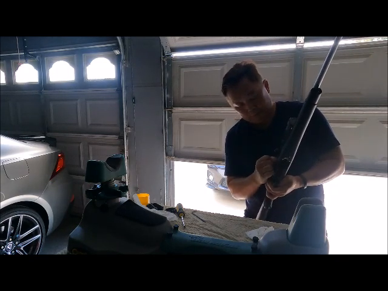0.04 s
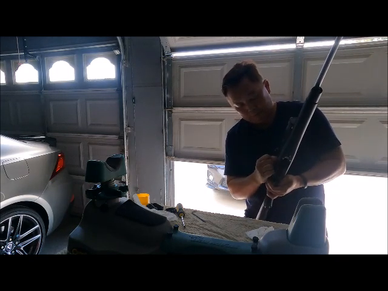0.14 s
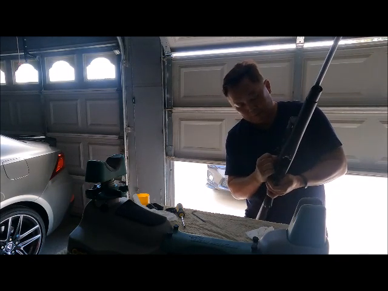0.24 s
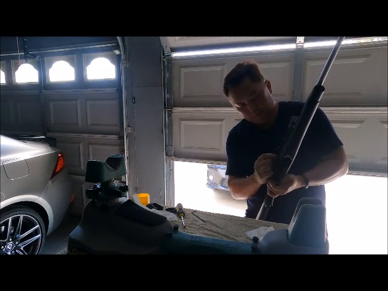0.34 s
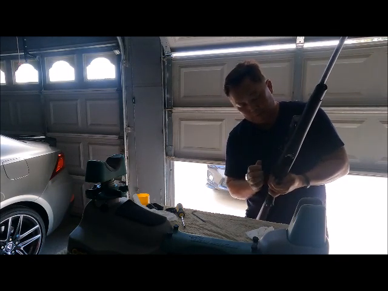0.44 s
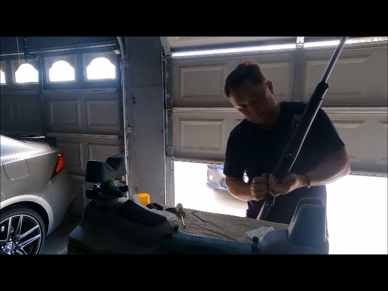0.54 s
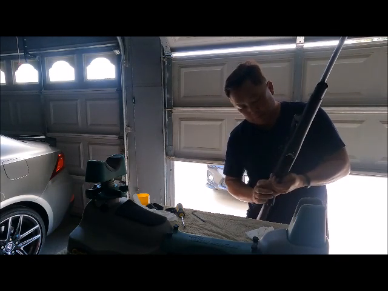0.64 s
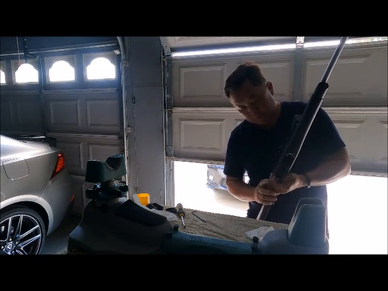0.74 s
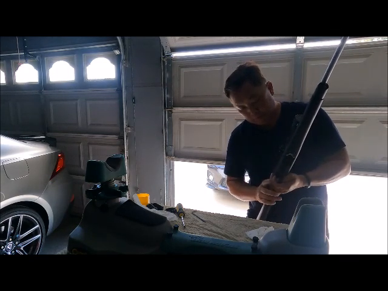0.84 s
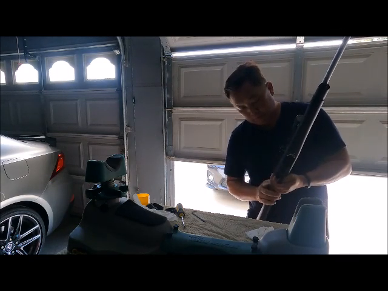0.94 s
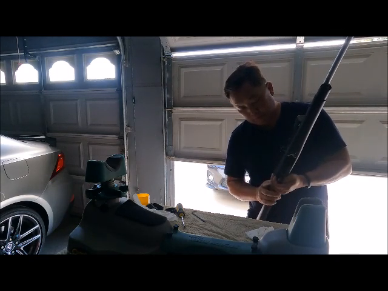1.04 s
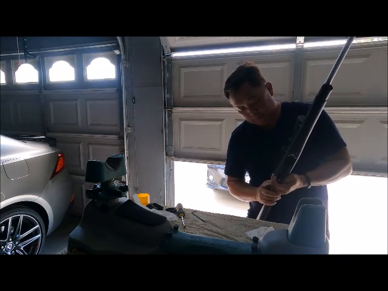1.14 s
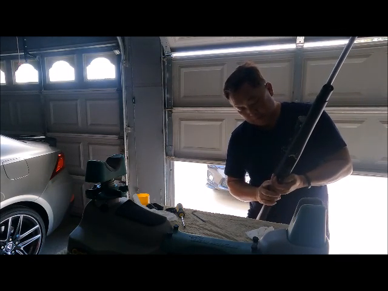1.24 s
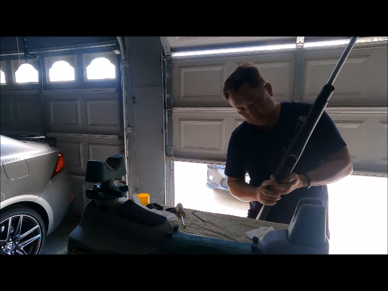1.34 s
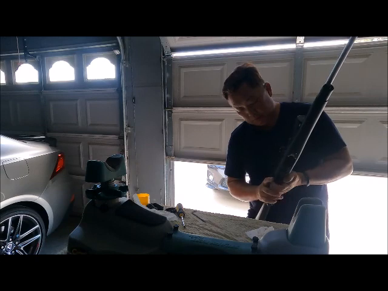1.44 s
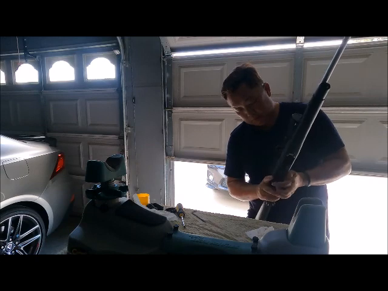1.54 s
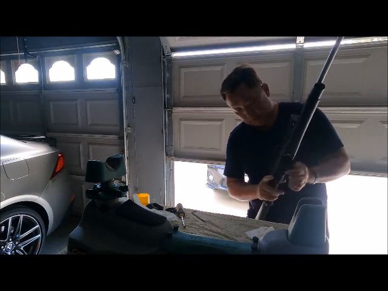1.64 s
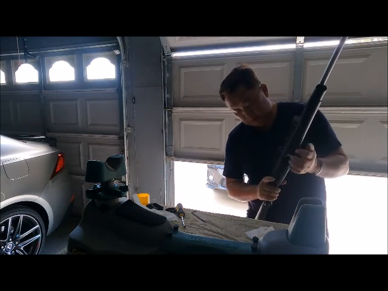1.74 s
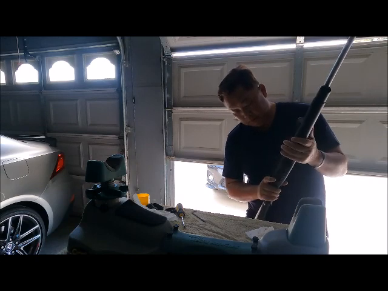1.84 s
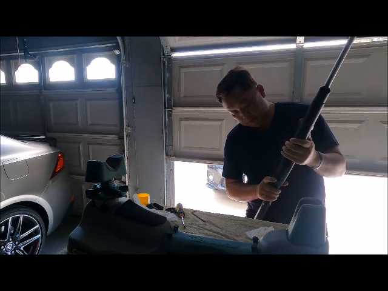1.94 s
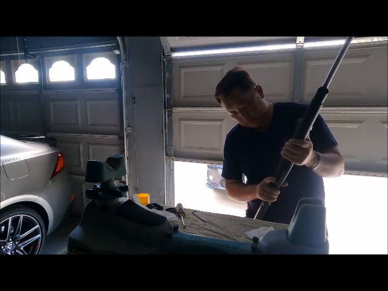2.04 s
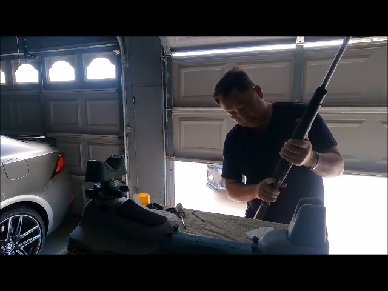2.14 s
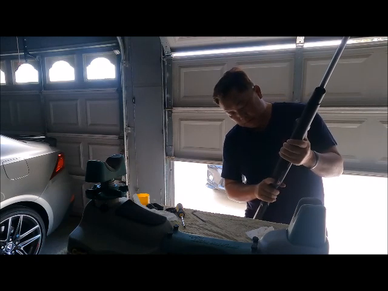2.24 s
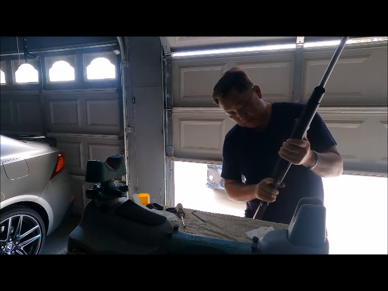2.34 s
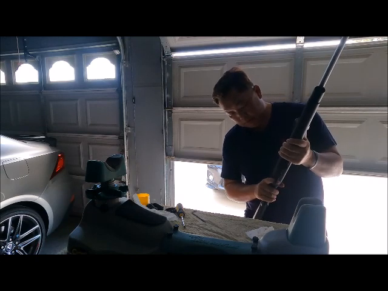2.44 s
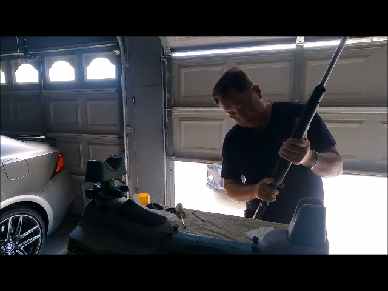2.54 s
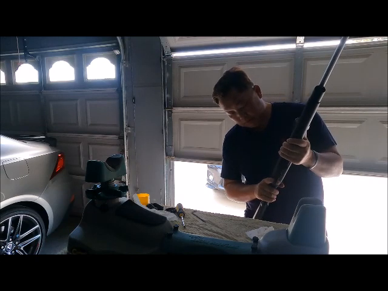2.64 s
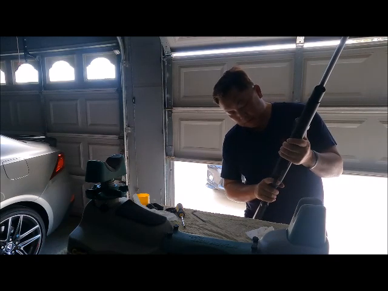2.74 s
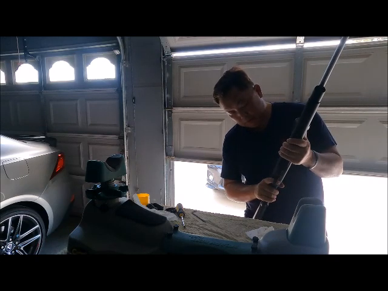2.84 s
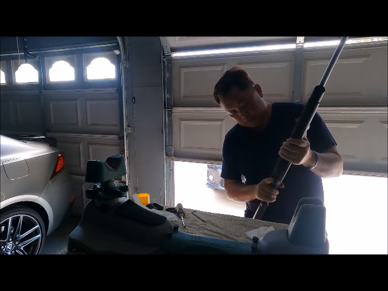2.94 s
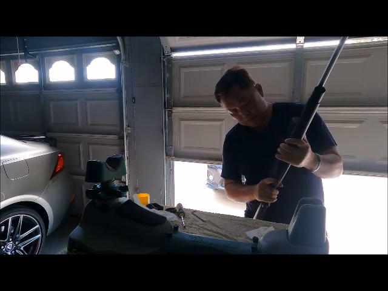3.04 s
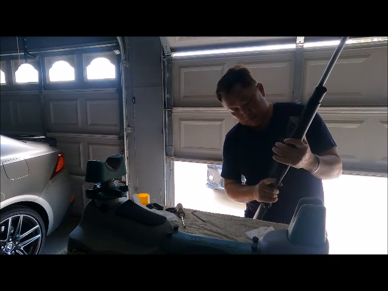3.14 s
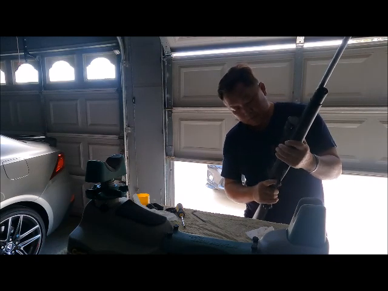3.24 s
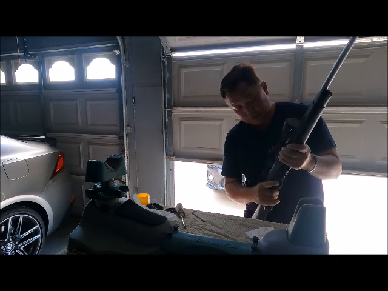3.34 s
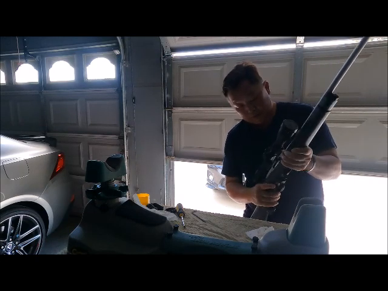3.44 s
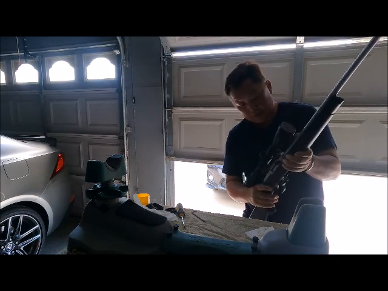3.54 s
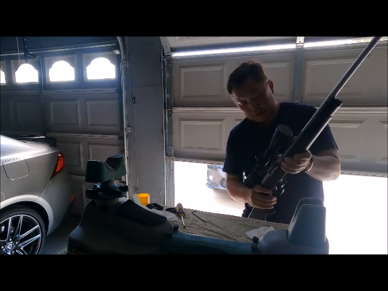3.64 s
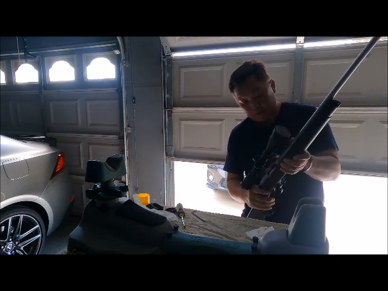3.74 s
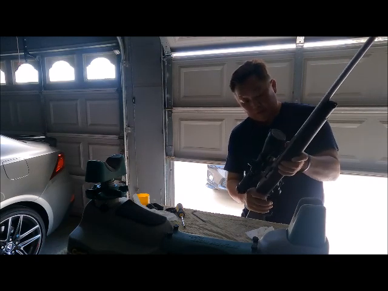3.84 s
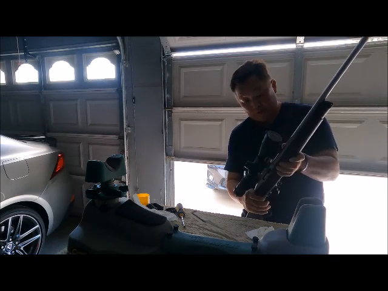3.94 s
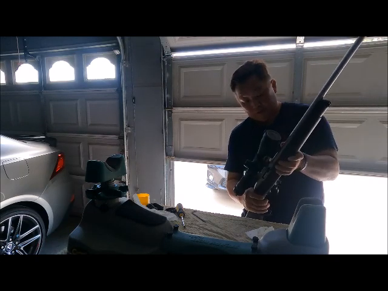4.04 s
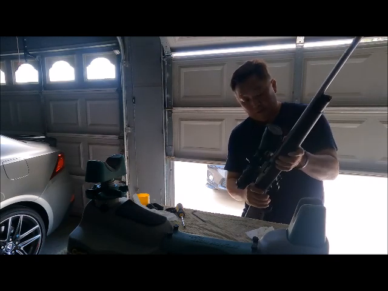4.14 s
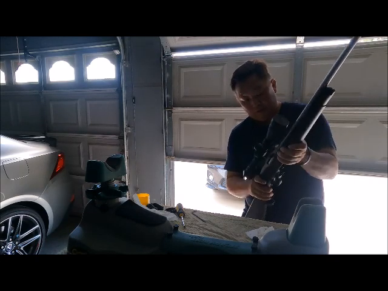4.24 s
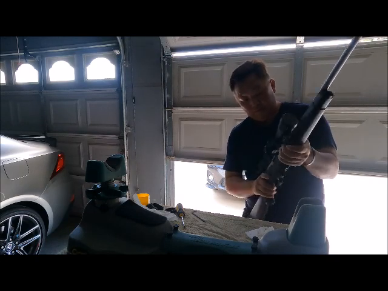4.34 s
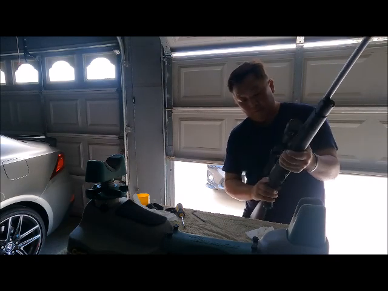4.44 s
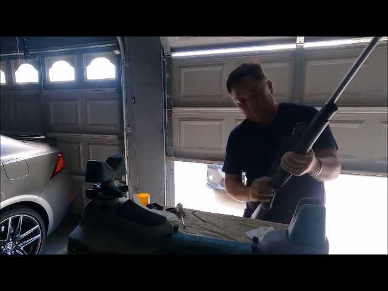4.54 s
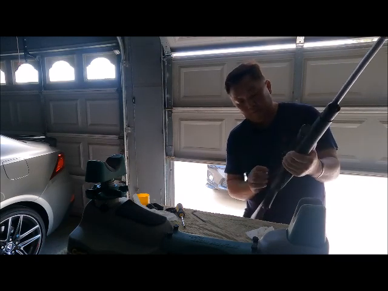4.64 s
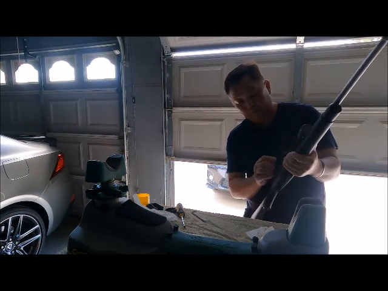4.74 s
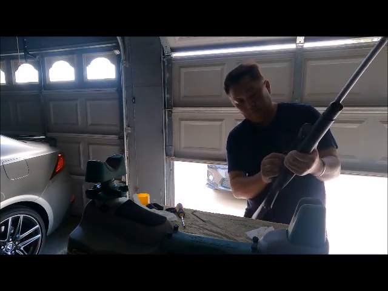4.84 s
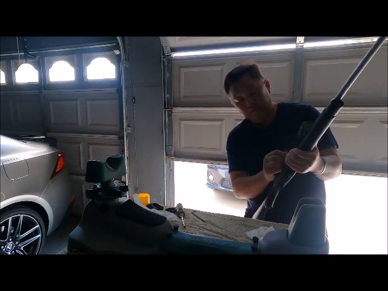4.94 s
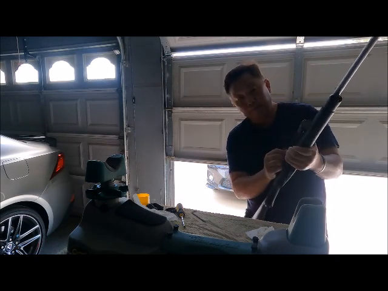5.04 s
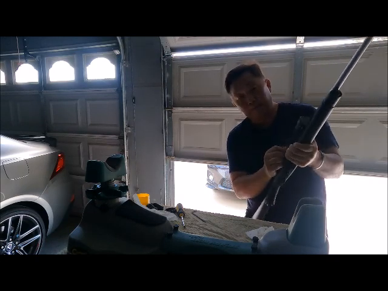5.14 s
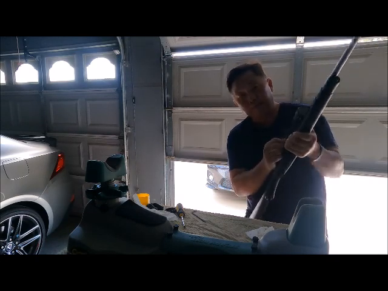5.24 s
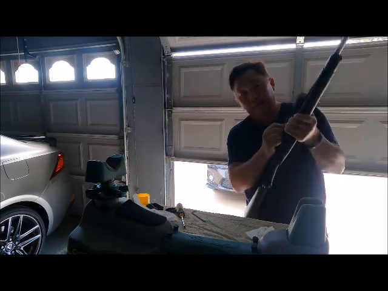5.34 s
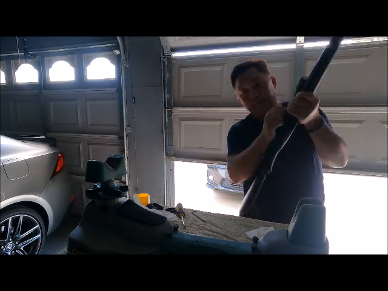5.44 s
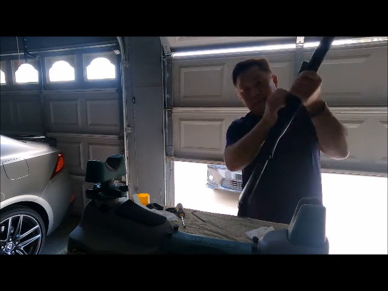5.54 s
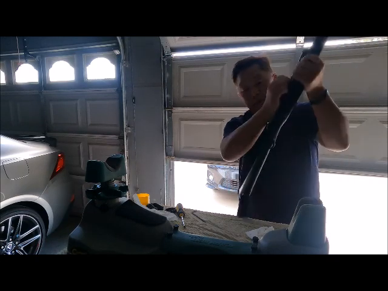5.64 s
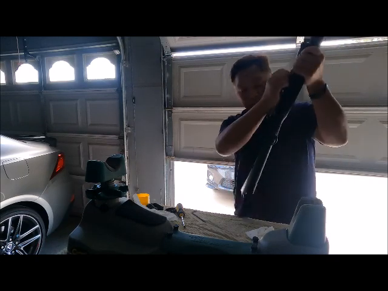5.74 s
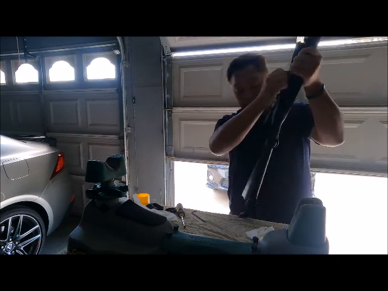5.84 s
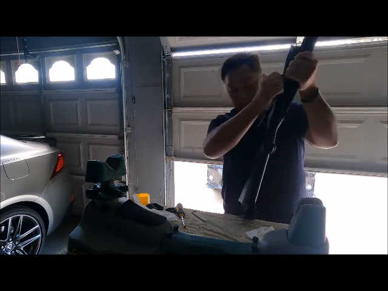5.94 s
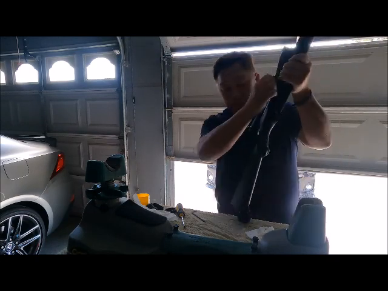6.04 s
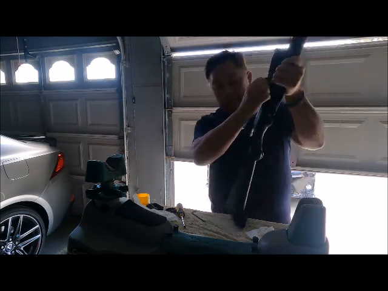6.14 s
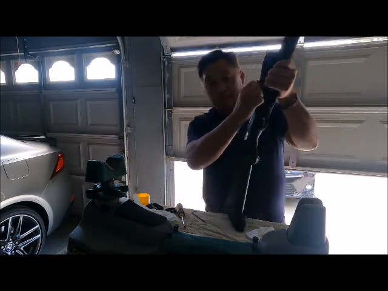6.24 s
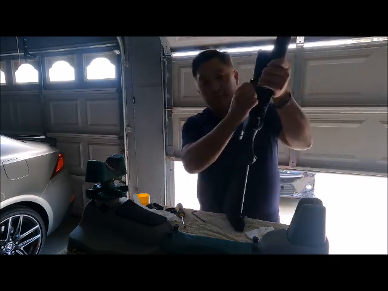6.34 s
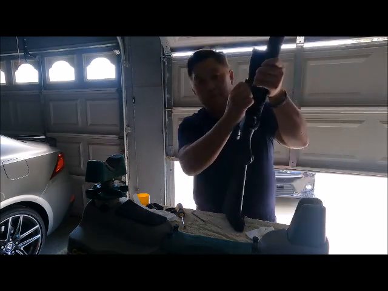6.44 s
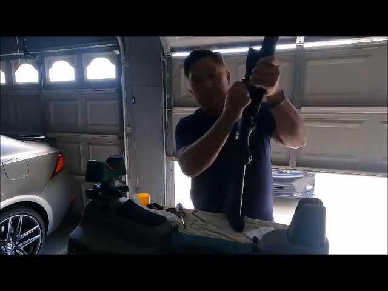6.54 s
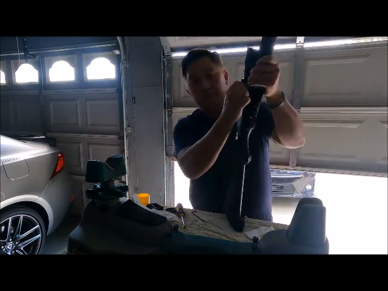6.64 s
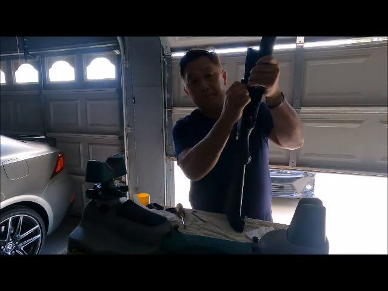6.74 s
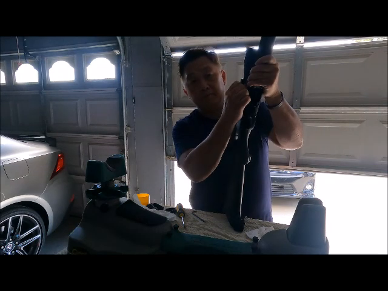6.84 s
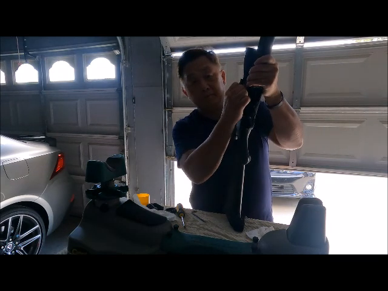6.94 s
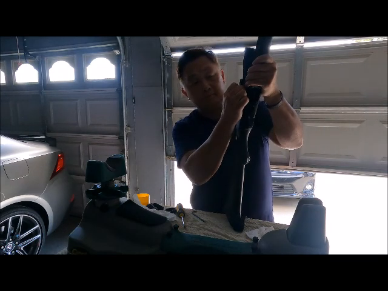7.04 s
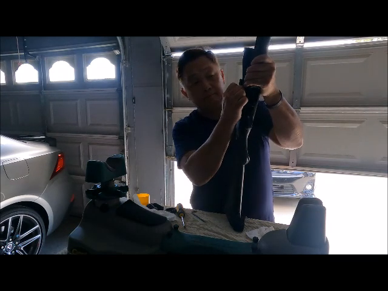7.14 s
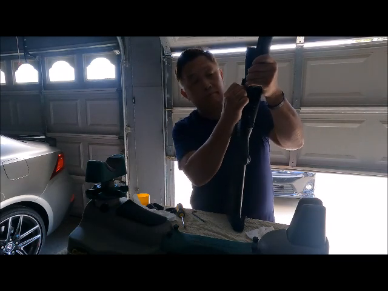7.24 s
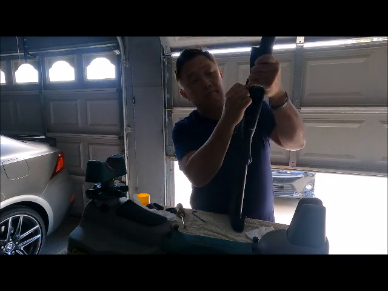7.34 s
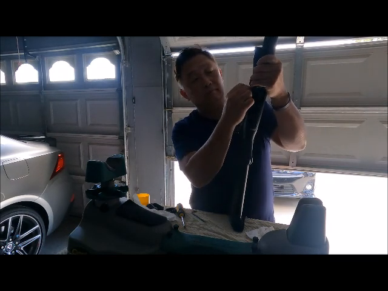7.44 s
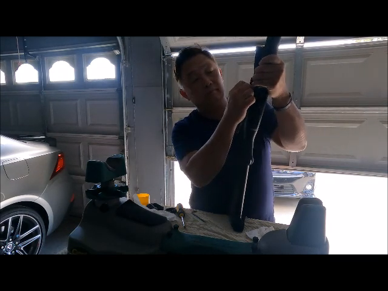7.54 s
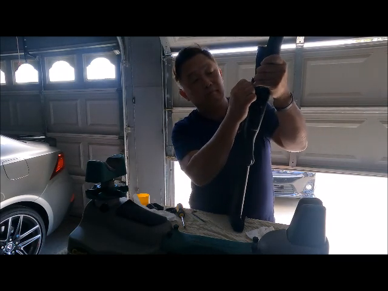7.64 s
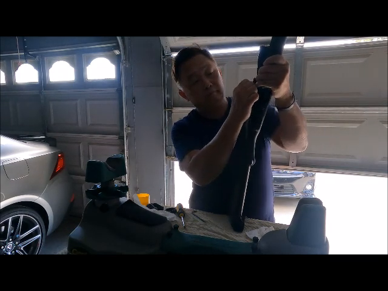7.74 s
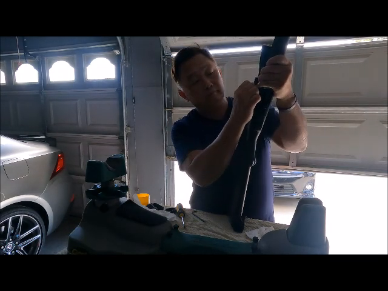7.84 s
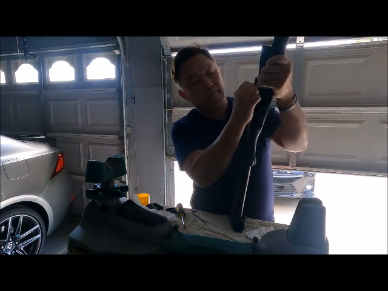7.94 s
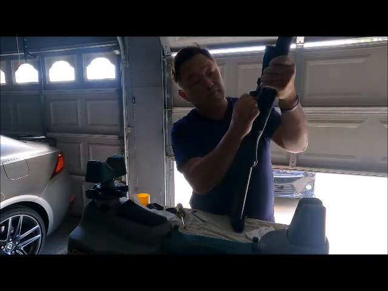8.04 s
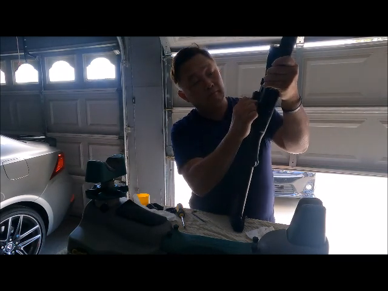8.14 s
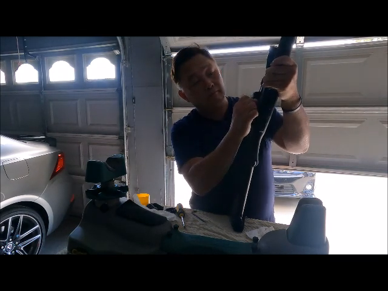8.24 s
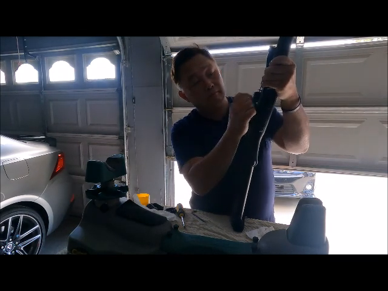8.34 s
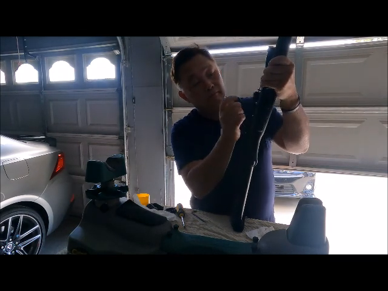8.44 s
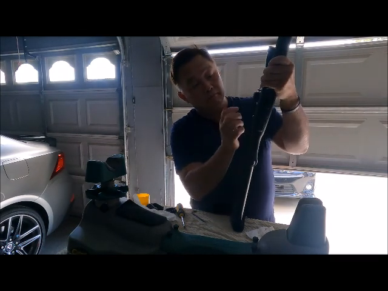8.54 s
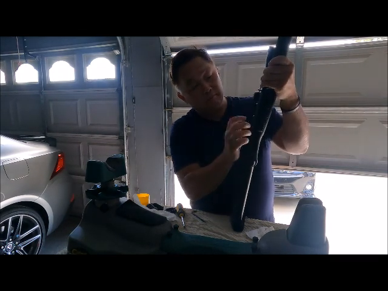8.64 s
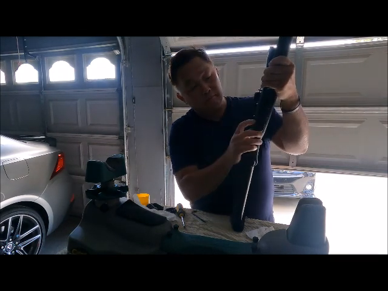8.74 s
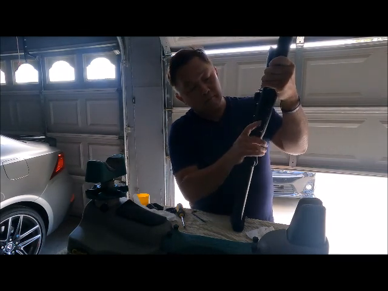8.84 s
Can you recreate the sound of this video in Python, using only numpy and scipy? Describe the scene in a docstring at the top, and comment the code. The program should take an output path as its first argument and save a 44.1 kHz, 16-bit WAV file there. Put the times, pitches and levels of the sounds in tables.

```python
"""A rifle's bolt and trigger are worked by hand over a bench in a concrete garage with the door half open.
Steel snaps on steel as impacts exciting damped modes; the butt set down on the bench drives its modes too.
Hands and the sliding bolt rub as grains of friction noise; outdoor rumble, hiss and hums drift in.
Shaped noise gives the garage echo, and a small recorder limits its treble hard after loud clicks."""
import sys
import numpy as np
from scipy import signal
from scipy.fft import rfft, irfft
from scipy.io import wavfile
from scipy.ndimage import uniform_filter1d

SR = 44100
rng = np.random.default_rng(int(sys.argv[2]) if len(sys.argv) > 2 else 0)


def unload_wav(signal):
    """Save mono or channel-first audio to the path in sys.argv[1] as 16-bit WAV at rate SR, clipped to [-1, 1]."""
    wavfile.write(
        sys.argv[1],
        SR,
        np.round(np.clip(np.atleast_2d(signal).T, -1, 1) * 32767).astype(np.int16),
    )


N = 391608   # samples


def from_db(db):
    """Logarithmic level: decibels to amplitude gain."""
    return 10 ** (np.asarray(db) / 20)


def rms_one(x):
    """Normalisation: scale to unit rms."""
    return x / np.sqrt(np.mean(x ** 2) + 1e-20)


def at_hz(points, hz):
    """Logarithmic frequency: interpolate a table of (f/Hz, value) along a log-frequency axis."""
    f_hz, value = np.transpose(points)
    return np.interp(np.log(hz), np.log(f_hz), value)


def butter(x, order, hz, kind="low"):
    """Maximally flat filtering: Butterworth low-pass, high-pass or band-pass."""
    return signal.sosfilt(signal.butter(order, hz, kind, fs=SR, output="sos"), x)


def drift(rate_hz):
    """Random modulation: white noise through a double real pole, scaled to unit rms."""
    step = 40   # samples between computed points
    pole = np.exp(-2 * np.pi * rate_hz * step / SR)
    white = rng.standard_normal(N // step + 2002)
    slow = signal.lfilter([1], [1, -2 * pole, pole ** 2], white)[2000:]   # start-up dropped
    return np.interp(np.arange(N) / step, np.arange(len(slow)), rms_one(slow))


def ring(x, hz, t60):
    """Damped resonance: a unit impulse sets off a decaying sine of initial height 1."""
    radius = from_db(-60 / (t60 * SR))
    omega = 2 * np.pi * hz / SR
    feedback = [1, -2 * radius * np.cos(omega), radius ** 2]
    return signal.lfilter([0, np.sin(omega)], feedback, x + 1e-18)


# likeness of left and right in diffuse sound: (f/Hz, correlation)
STEREO_LIKENESS = [(60, 1), (550, 0.85), (1650, 0.53), (4970, 0.68), (15000, 0.274)]


def noise_bands(size):
    """Interchannel coherence: yields (f/Hz, stereo half-octave noise), mid and side mixed to the set likeness."""
    edges = 22 * 2 ** np.arange(0, 9.9, .5)
    white = rng.standard_normal((2, 2, size))   # neighbouring bands take different noise
    for k, (low, high) in enumerate(zip(edges, edges[1:])):
        centre = np.sqrt(low * high)
        mid, side = butter(white[k % 2], 2, [low, high], "band")
        alike = at_hz(STEREO_LIKENESS, centre)
        yield centre, np.sqrt(1 + alike) * mid + np.sqrt(1 - alike) * side * [[1], [-1]]


# spectral density of the outdoor noise: (f/Hz, relative level/dB per Hz)
OUTDOOR_SPECTRUM = [(25, -27), (49, 1.5), (93, -9.5), (176, 3), (383, -4), (475, -12.5), (709, -2),
                    (833, -14.5), (1540, -13), (3090, -50), (5720, -22), (9270, -41.5), (15000, -71)]
# course of the outdoor level: (t/s, level/dB)
OUTDOOR_SWELL = [(0, -46), (0.599, -56), (1.201, -55.5), (1.8, -51), (2.503, -51.5), (4.302, -49.5),
                 (4.9, -49), (5.795, -49.5), (6.8, -51), (8.88, -52.5)]
# narrow humming bands: (f/Hz, nominal width/Hz, level/dB against the outdoor noise)
HUM_BANDS = [(190, 22, -6), (285, 16, -10.5), (381.7, 4, -10.5), (472.7, 4.6, -12), (587, 6, -13.5),
             (5630, 210, -21.5)]


def outdoors():
    """Modulated band noise: rumble and hiss swell in patches, lows most, with a few wavering hums."""
    together = drift(0.95)
    wash = 0
    for hz, band in noise_bands(size=N):
        swell_db = 1.7 * together + 2.0 * drift(4.0)
        depth = min(1, 640.0 / hz) ** .5   # treble swells less
        wash = wash + from_db(at_hz(OUTDOOR_SPECTRUM, hz) + swell_db * depth) * band
    white = rng.standard_normal(N)
    # noise through a narrow resonance wavers
    hums = sum(from_db(db) * rms_one(ring(white, hz, 9.2 / width)) for hz, width, db in HUM_BANDS)
    level_db = np.interp(np.arange(N) / SR, *np.transpose(OUTDOOR_SWELL))
    return from_db(level_db) * (rms_one(wash) + hums)


# reverberation time of the garage: (f/Hz, t60/s)
GARAGE_DECAY = [(100, 0.62), (500, 0.73), (1500, 0.51), (4000, 0.63), (8000, 0.48), (14000, 0.3)]
# initial colour of the echo: (f/Hz, relative level/dB)
GARAGE_TONE = [(100, -1), (700, -2.5), (2000, 3.5), (5000, 5.5), (8000, 0), (14000, -1)]


def garage(x):
    """Diffuse reverberation: convolve with noise, lumpy with early reflections, dying band by band."""
    time = np.arange(SR) / SR
    tail = 0
    for hz, band in noise_bands(size=SR):
        decay_db = 60 * time / at_hz(GARAGE_DECAY, hz)
        tail = tail + from_db(at_hz(GARAGE_TONE, hz) - decay_db) * band
    onset = np.clip((time - .003) / 0.0016, 0, 1)   # silent 3 ms, then builds up over 1.6 ms
    lumps_db = 5.04 * np.exp(-time / .06) * drift(120)[:SR]
    tail = tail * onset * from_db(lumps_db)
    tail = tail / np.sqrt(np.sum(tail ** 2) / 2)   # unit energy per channel on average
    return signal.oaconvolve(x[None], tail, axes=1)[:, :N]


# spectral density of friction: (f/Hz, relative level/dB per Hz)
RUB_SPECTRUM = [(480, -18.5), (1020, -15.5), (1660, -12), (4130, -14.5), (7470, -14.5), (15000, -34.5)]
# bolt slides into its stop: (t/s of the stop, relative level/dB at the stop)
BOLT_SLIDES = [(0.4769, -24), (2.017, -41), (5.949, -47), (8.145, -31.5), (8.457, -32.5)]
SLIDE_RISE_DB_PER_S = 1001
# hands and cloth on the stock: (t/s of the peak, relative level/dB, swell/s, fade/s, bright share 0-1);
# swell and fade each span 20 dB
HAND_RUSTLES = [(0.068, -35, 0.016, 0.052, 0.6), (1.55, -73, 0.24, 0.4, 0.73),
                (1.963, -62, 0.021, 0.019, 0), (3.46, -72.5, 0.11, 1, 0.43), (3.7, -71.5, 0.19, 0.43, 1),
                (4.3, -63.5, 0.061, 0.15, 0.6), (4.52, -67.5, 0.097, 1, 0.42),
                (4.98, -73, 0.056, 0.57, 0.73), (5.531, -66.5, 0.23, 0.33, 0.78),
                (5.68, -57.5, 0.059, 0.1, 0.53), (5.822, -46.5, 0.02, 0.1, 0.33),
                (5.856, -53.5, 0.028, 0.16, 0.18), (6.57, -58, 0.23, 0.14, 0.36),
                (6.767, -46, 0.059, 0.079, 0.28), (7.322, -50, 0.0092, 0.25, 0),
                (7.9, -71.5, .055, 0.48, 0.5)]
BRIGHT_FROM_HZ = 3700


def rubbing():
    """Stick-slip friction: dense uneven grains under each slide and rustle; cloth hisses brighter than palms."""
    time = np.arange(N) / SR
    grains = rng.standard_normal(N) * from_db(2.8 * drift(200) + 1.2 * drift(24))
    hz = np.maximum(np.arange(N // 2 + 1) * SR / N, 1)
    grains = rms_one(irfft(rfft(grains) * from_db(at_hz(RUB_SPECTRUM, hz)), N))
    dull = 2 * butter(grains, 1, BRIGHT_FROM_HZ)
    bright = 2 * grains - dull
    out = np.zeros(N)
    for stop_s, db in BOLT_SLIDES:
        rise_db = db - SLIDE_RISE_DB_PER_S * np.abs(stop_s - time)
        out += grains * from_db(rise_db) * (time < stop_s)   # silent from the stop on
    for peak_s, db, swell_s, fade_s, share in HAND_RUSTLES:
        away = np.maximum((peak_s - time) / swell_s, (time - peak_s) / fade_s)
        level = from_db(np.maximum(db - 20 * away, -200))
        out += level * (share * bright + (1 - share) * dull)
    return out


WAYS = 3   # separate paths into the room


def strike(times, levels_db, modes, contact_s, scatter_db):
    """Modal superposition: each blow feeds every mode (a column of levels_db) with its own strength.
    Row 0 is heard directly, as an uneven dying chatter; the other rows leave on different ways into the room."""
    steps = np.arange(round(5 * np.max(contact_s) * SR) + 200)
    at = np.round(np.array(times) * SR).astype(int)[:, None] + steps
    fade = (steps + 1) ** 0.93 * np.exp(-steps / (np.reshape(contact_s, (-1, 1)) * SR))
    strengths = from_db(levels_db + rng.normal(0, scatter_db, levels_db.shape))
    out = np.zeros((1 + WAYS, N))
    for k, (hz, mode_db, t60) in enumerate(modes):
        chatter = rng.standard_normal(at.shape) * fade
        # the chatter gives the mode as much energy as one clean tap of that strength
        tap_energy = np.sum(ring(steps == 0, hz, t60) ** 2)
        chatter_energy = np.sum(ring(chatter, hz, t60) ** 2, axis=1)
        gain = strengths[:, k] * np.sqrt(tap_energy / chatter_energy)
        force = np.zeros((2, N))   # direct chatter, single tap into the room
        np.add.at(force[0], at, chatter * gain[:, None])
        # long thin rings are heard mostly directly
        force[1, at[:, 0]] = strengths[:, k] * min(1, 0.076 / t60)
        # neighbouring modes beam in different directions
        out[[0, 1 + k % WAYS]] += from_db(mode_db) * ring(force, hz, t60)
    return out


# blows through the butt: (t/s, thud relative level/dB, boom relative level/dB, knock relative level/dB,
# decay constant of the rattle/s)
BUTT_BLOWS = [(5.835, -50, -39.5, -50, 0.0047), (5.9525, -55, -23, -10.5, 0.011),
              (5.977, -56, -16.5, -13.5, 0.024), (7.3166, -52, -41, -30.5, 0.012),
              (7.426, -52, -28.5, -28, 0.0075), (8.1698, -42, -19, -24, 0.0027),
              (8.481, -11, -24, -33, 0.0016)]
# modes of the bench top and what lies on it: (f/Hz, relative level/dB, t60/s)
BENCH_MODES = [(472, -11.5, 0.51), (528.5, -11, 0.6), (598.3, -17, 0.26), (700, -9, 0.014),
               (913, -11, 0.049), (1084, -8.5, 0.036), (1237, -8.5, 0.044), (1305, -12, 0.22),
               (1528, -16, 0.13), (1645, -17, 0.11), (2020, -7.5, 0.0094), (2500, -10, 0.011),
               (3560, -3.5, 0.0026), (4640, -7.5, 0.0047), (7200, 6.5, 0.00093)]
# bench frame (first row) and top flexing: (f/Hz, relative level/dB, t60/s)
BOOM_MODES = [(52.6, 10, 0.021), (117.7, -14, 0.26), (149, -2, 0.14), (159.5, 2, 0.19), (215, -1.5, 0.14),
              (253.6, -4.5, 0.092)]


def bench():
    """Forced plate vibration: the butt pad drives the frame, the top's boom, and the knock of what lies on it."""
    s, thud_db, boom_db, knock_db, rattle_s = np.transpose(BUTT_BLOWS)
    pushes = np.zeros((2, N))   # on the frame, on the top
    pushes[:, (s * SR).astype(int)] = -from_db([thud_db, boom_db])   # always downward
    pushes[1] = butter(pushes[1], 2, 85, "high")   # the top alone radiates no deep bass
    boom = np.zeros(N)
    for k, (hz, db, t60) in enumerate(BOOM_MODES):
        boom += from_db(db) * ring(pushes[min(k, 1)], hz, t60)
    boom = butter(boom, 2, 450)   # the pad is soft
    knock_levels = np.outer(knock_db, np.ones(len(BENCH_MODES)))
    return boom, strike(s, knock_levels, BENCH_MODES, rattle_s, scatter_db=2.5)


# steel contacts: (t/s, relative level/dB of the low, middle, high and locked modes, contact decay constant/ms)
STEEL_CLICKS = [(0.0797, -11.5, -17, -30, -30, 1.2), (0.0836, -29, -18, -10, -21, 0.5),
                (0.0868, -6.5, -6, -5, -6, 0.65), (0.1047, 5.5, 7.5, -3, -11, 1.214),
                (0.4746, -17, -1, -18, -4.5, 0.34), (0.476, -28, -18, -17, -11, 0.38),
                (0.483, -31, -19, -21, -25, 0.31), (0.4873, 0, -12, 13, 16.5, 0.93),
                (1.1738, -28.5, -80.5, -7.5, -9.5, 0.58), (2.0125, -40, -22, -30, -37.5, 2.5),
                (2.6646, -16, -16.5, -13.5, -16.5, 1.36), (2.6715, -6.5, 4.5, 5, 10, 1.4),
                (2.6762, 2, -2, 5, 5, 1.6), (2.682, -7.5, -12.5, -1, -19, 2.43),
                (3.162, -49, -31, -31, -41.5, 0.74), (3.1685, -24, -24, -39, -32, 1.0),
                (3.178, -37, -20.5, -21, -26.5, 1.2), (3.3616, -34.5, -23, -34, -41, 2.1),
                (3.6886, -47, -59, -41, -31, 12), (5.5204, -39, -46, -40, -21.5, 4.7),
                (5.9496, 4, -14, 3, -20, 6.7), (6.0768, -17, -32, -2.5, -17, 11.4),
                (6.7126, -44, -16.5, -19.5, -31, 0.97), (7.1042, -43, -25, -24, -42, 0.42),
                (7.3171, -15.5, -30, -22, -23, 6.6), (7.4248, -2.5, -6.5, -5.5, -6, 1.25),
                (7.8918, -45, -38, -48.5, -42, 1.2), (8.1432, -14, -8, 1, 2.5, 0.65),
                (8.149, 0, -21, -20, -21, 7.8), (8.1676, 2.5, 9, -2, -4, 0.94),
                (8.459, -8, -4.5, -16, -20, 1.59), (8.4777, 4.5, 2, 11.5, 14.5, 1.2)]
# tiny bright ticks of steel: (t/s, relative level/dB)
STEEL_TICKS = [(1.976, -40), (2.026, -28), (5.15, -44.5), (5.2522, -44), (5.7777, -33), (6.46, -42)]
TICK_DULL_DB, TICK_MS = -10, 0.56   # low and locked modes against the rest; contact decay constant
# damped broad modes give the snap, thin ones ring on: (f/Hz, relative level/dB, t60/s)
RIFLE_MODES = [(1058, -13.5, 0.016), (1013, -31, 0.04), (1399, -13.5, 0.051), (1560, -2.5, 0.0056),
               (2090, -4.5, 0.0035), (2334, -24.5, 0.025), (2420, 5, 0.000815), (3740, -2, 0.0019),
               (4330, -10, 0.0056), (4920, 3.5, 0.0014), (6220, -5, 0.0041), (6470, 0, 0.002),
               (7470, -22, 0.12), (7480, 0.5, 0.0051), (8740, -13.5, 0.013), (9490, -15, 0.016),
               (12220, -26, 0.0027), (7650, -24.5, 0.04)]
# borders between low, middle and high modes: (f/Hz)
MODE_GROUP_EDGES = [2500, 6200]
# modes that sound when bolt and barrel are locked together: (row of RIFLE_MODES)
LOCKED_ROWS = [0, 1, 5, 12, 13, 17]
# a loose fitting rattles against the action: (t/s, relative level/dB)
FITTING_RATTLES = [(4.51, -45.5), (4.555, -40), (4.984, -44), (5.109, -35), (5.402, -46.5), (6.715, -29.5),
                   (6.767, -26.5), (6.777, -32.5), (6.787, -30.5)]
# modes of the loose fitting: (f/Hz, relative level/dB, t60/s)
FITTING_MODES = [(1840, -2, 0.03), (2300, -5, 0.017), (2920, -12, .008), (1290, -4, .006)]
SLIM_HZ = 863


def rifle():
    """Impact excitation: steel contacts ring the action, bolt and stock; so slim a body radiates no bass."""
    ticks = [(s, db + TICK_DULL_DB, db, db, db + TICK_DULL_DB, TICK_MS) for s, db in STEEL_TICKS]
    contacts = np.array(STEEL_CLICKS + ticks)
    group = np.searchsorted(MODE_GROUP_EDGES, np.array(RIFLE_MODES)[:, 0])
    group[LOCKED_ROWS] = 3
    levels_db = contacts[:, 1 + group]
    rings = strike(contacts[:, 0], levels_db, RIFLE_MODES, contacts[:, 5] / 1000, scatter_db=1.6)
    s, db = np.transpose(FITTING_RATTLES)
    rattle_levels = np.outer(db, np.ones(len(FITTING_MODES)))
    rings += strike(s, rattle_levels, FITTING_MODES, 0.0014, scatter_db=0.0)
    return from_db(-5.0) * butter(rings, 6, SLIM_HZ, "high")


def scene():
    """Superposition of fields: near sources, their garage echo, and the outdoors, a touch earlier on the right."""
    boom, knock = bench()
    steel, rub, far = rifle(), rubbing(), outdoors()
    near = (steel[0] + from_db(3.0) * rub) * from_db([[-1.2], [1.2]])   # leans right
    near = near + knock[0] + boom
    ways = from_db(-5.0) * steel[1:] + from_db(8.5) * knock[1:]
    ways[0] += from_db(5.0) * rub + from_db(-3.0) * boom
    echo = sum(garage(way) for way in ways) * from_db([[.3], [-.3]])
    far[0] = np.roll(far[0], 1)   # left one sample later
    return near + echo + far


CEILING_DB, SQUEEZE, RELEASE_DB_PER_S = -14.5, 0.89, 93   # SQUEEZE: share of the excess taken off


def limiter_db(treble):
    """Dynamic range compression: cut/dB from short-term power; click fronts slip through, release is steady."""
    power = uniform_filter1d(np.mean(treble ** 2, axis=0), round(0.00075 * SR))   # over 0.75 ms
    power_db = 10 * np.log10(np.abs(power) + 1e-18)
    over = np.maximum(power_db - CEILING_DB, 0) * SQUEEZE
    ramp = RELEASE_DB_PER_S * np.arange(N) / SR
    held = np.maximum.accumulate(over + ramp) - ramp   # peak hold that falls at the release rate
    close = np.exp(-1 / (0.0013 * SR))   # 1.3 ms smoothing
    return signal.lfilter([1 - close], [1, -close], held)


MIC_TOP_HZ, LEFT_BOTTOM_HZ, CROSSOVER_HZ = 10600, 45, 734
CUTOFF_HZ = 16500   # stopband edge


def record(dry):
    """Nonlinear transduction: dull top, two-band limiter, bass bump under hard limiting, less deep bass
    on the left, soft clipping and a steep top cut."""
    dry = butter(dry, 2, MIC_TOP_HZ)
    bass = butter(dry, 2, CROSSOVER_HZ)
    treble = dry - bass
    cut_db = limiter_db(treble)
    treble = treble * from_db(-cut_db)
    # the bass band gives way less, and more slowly
    slow = np.exp(-1 / (.15 * SR))
    slow_cut_db = signal.lfilter([1 - slow], [1, -slow], cut_db)
    bass = bass * from_db(-.3 * cut_db - 0.64 * slow_cut_db)
    # a one-sided distortion grows with the cut; its bass part is the bump
    lopsided = -np.minimum(treble ** 2, 1) * (cut_db / 20) ** 3
    bump = butter(lopsided, 2, [20, 80], "band")
    out = bass + treble + bump * from_db(19.5)
    out[0] = butter(out[0], 1, LEFT_BOTTOM_HZ, "high")
    out = out / (1 + out ** 4) ** .25   # soft clipping
    return signal.sosfilt(signal.cheby2(14, 90, CUTOFF_HZ, fs=SR, output="sos"), out)


dry = scene()
out = record(dry)
unload_wav(out)
```